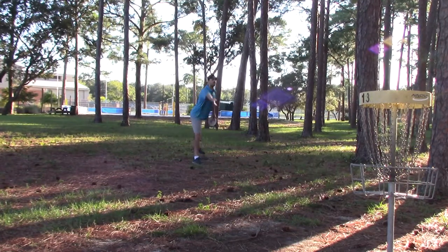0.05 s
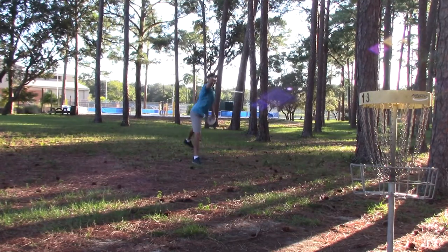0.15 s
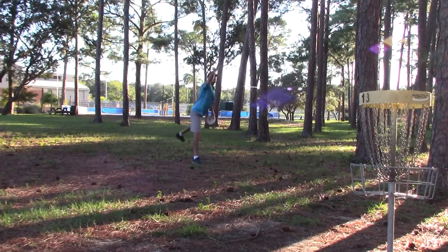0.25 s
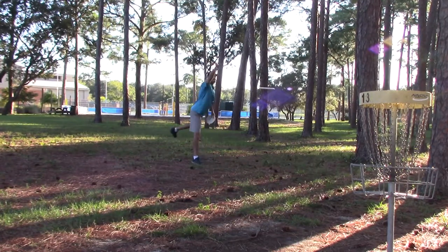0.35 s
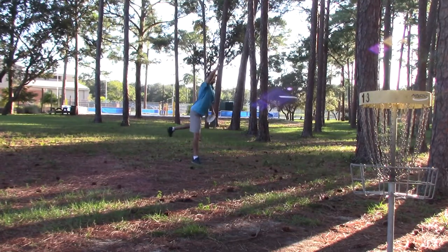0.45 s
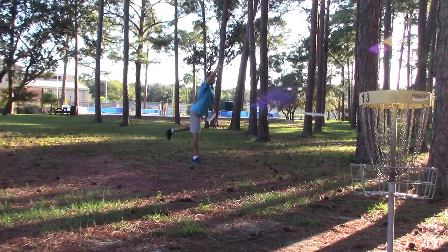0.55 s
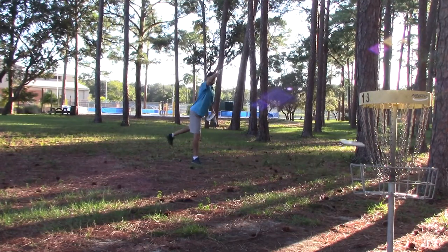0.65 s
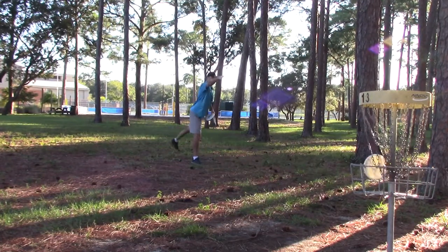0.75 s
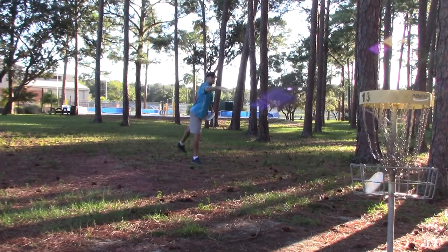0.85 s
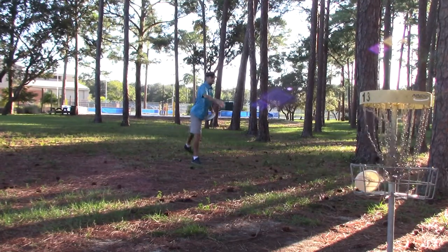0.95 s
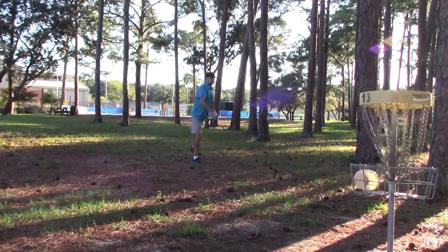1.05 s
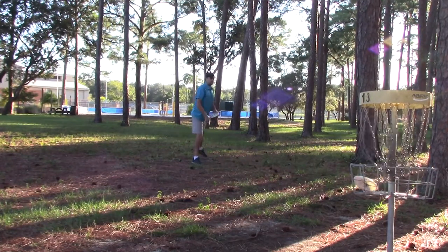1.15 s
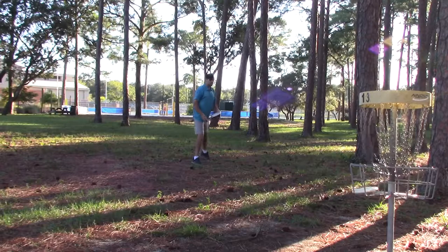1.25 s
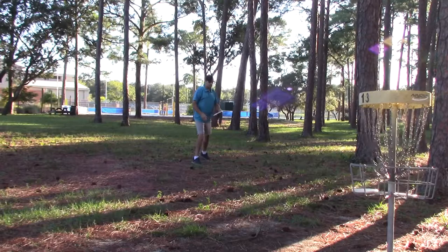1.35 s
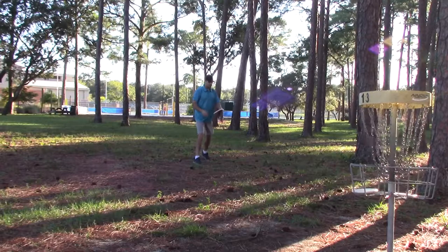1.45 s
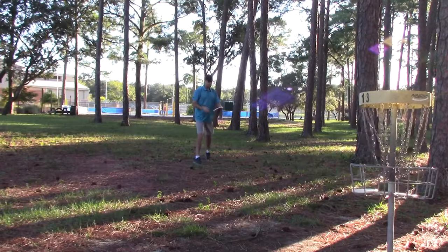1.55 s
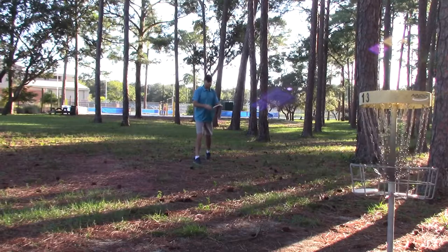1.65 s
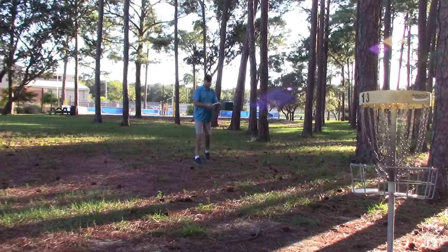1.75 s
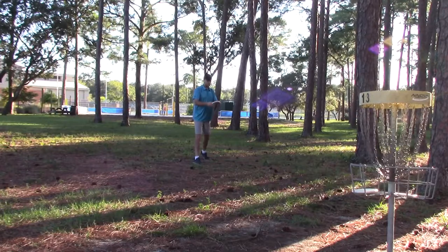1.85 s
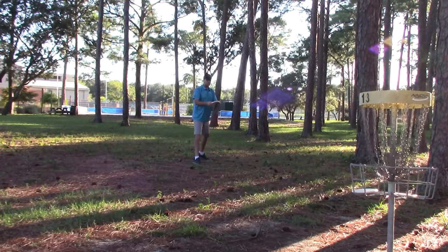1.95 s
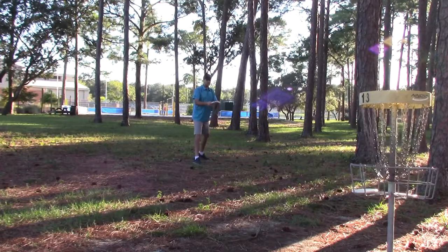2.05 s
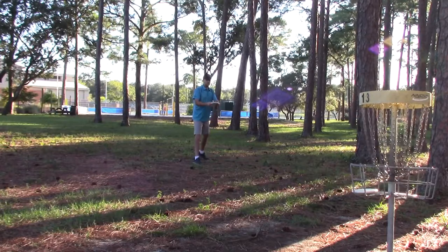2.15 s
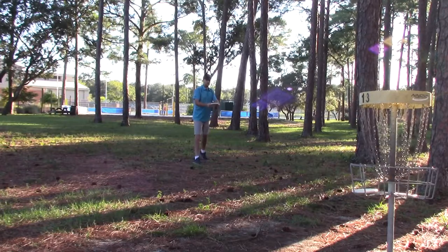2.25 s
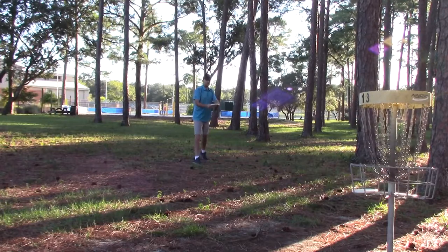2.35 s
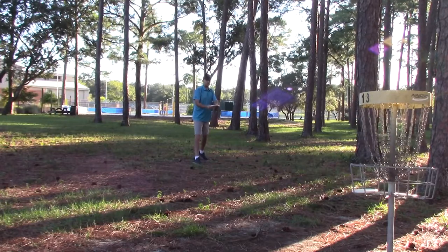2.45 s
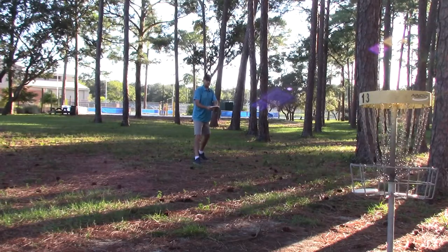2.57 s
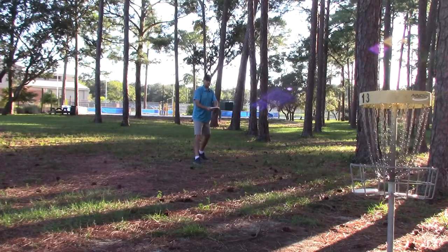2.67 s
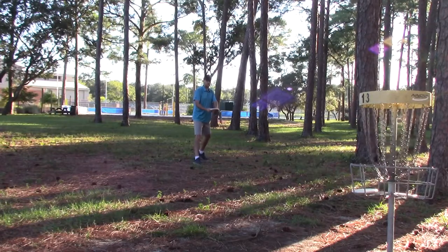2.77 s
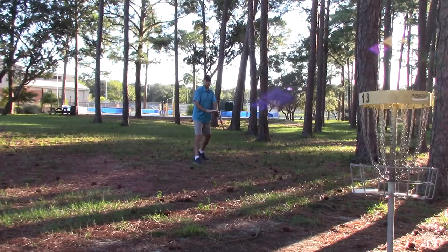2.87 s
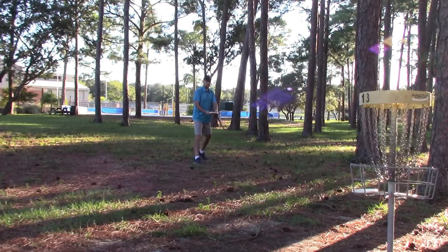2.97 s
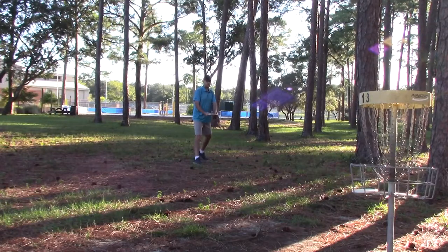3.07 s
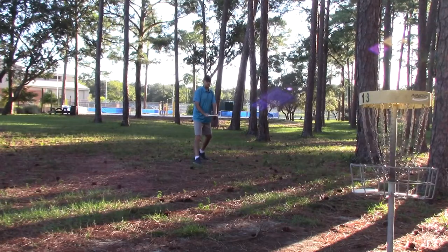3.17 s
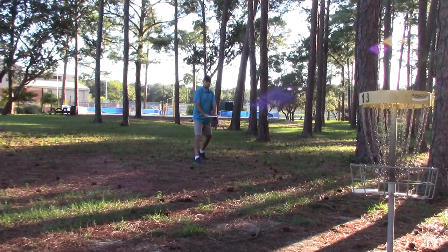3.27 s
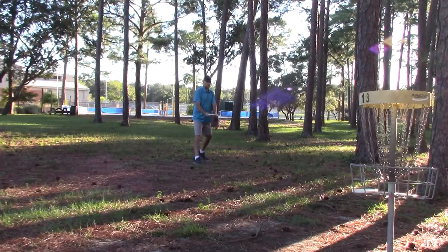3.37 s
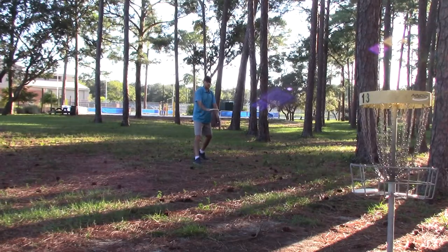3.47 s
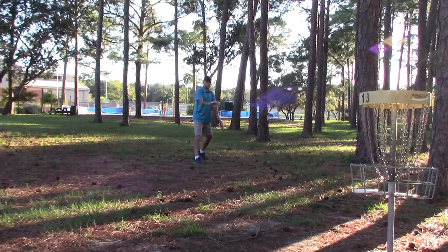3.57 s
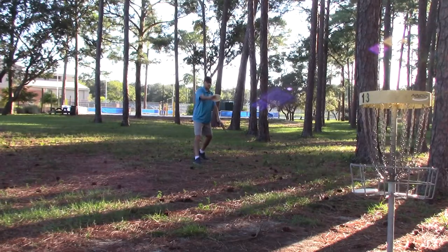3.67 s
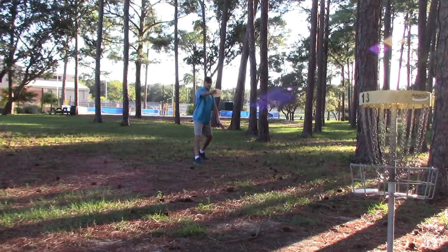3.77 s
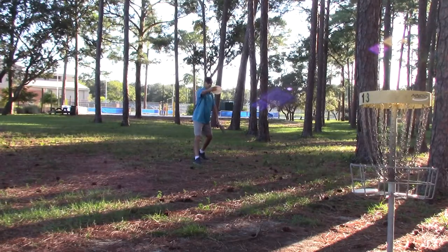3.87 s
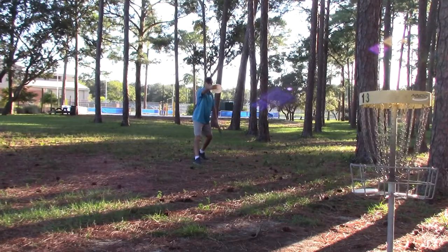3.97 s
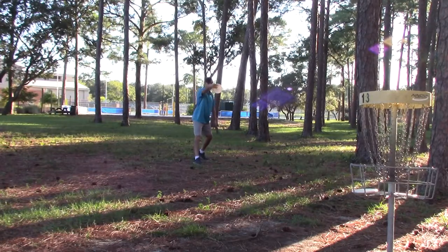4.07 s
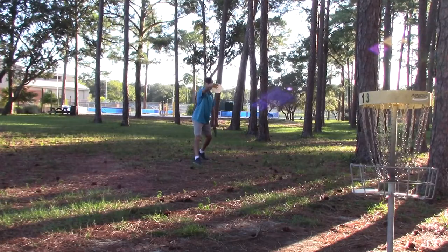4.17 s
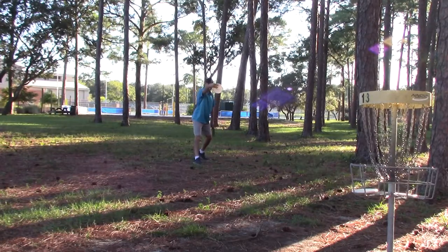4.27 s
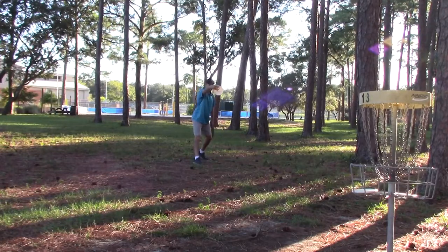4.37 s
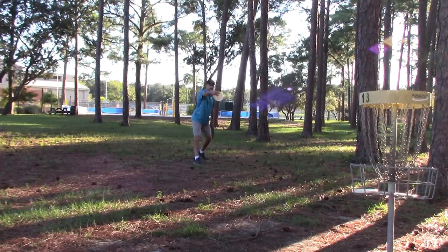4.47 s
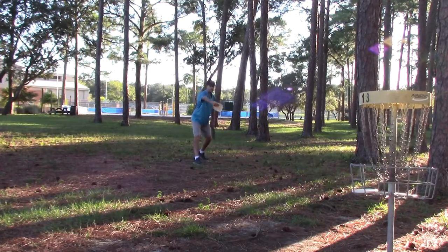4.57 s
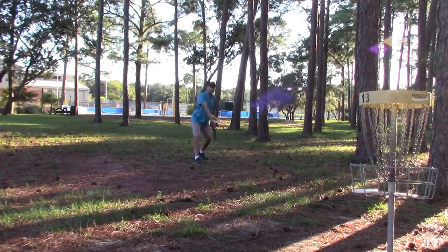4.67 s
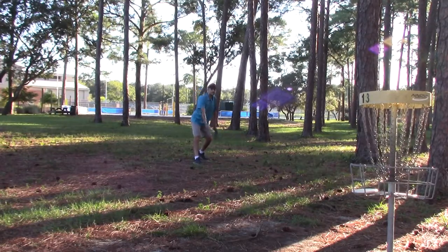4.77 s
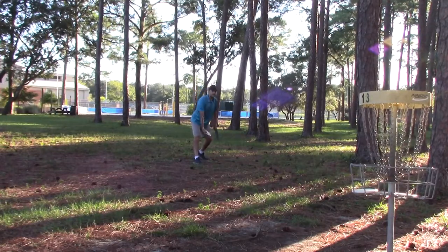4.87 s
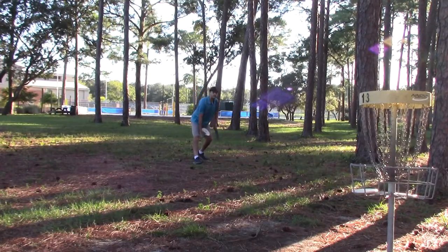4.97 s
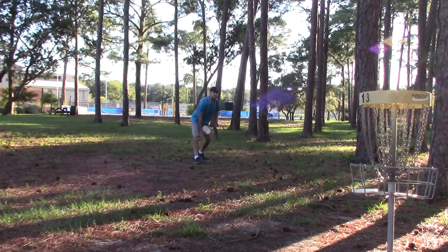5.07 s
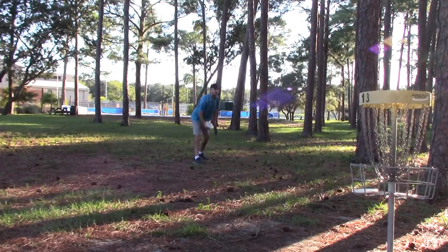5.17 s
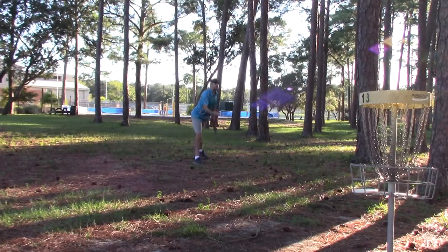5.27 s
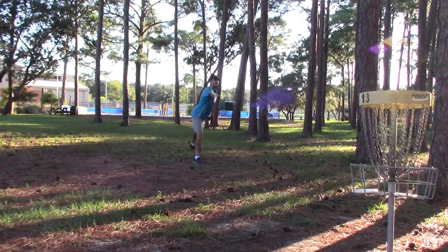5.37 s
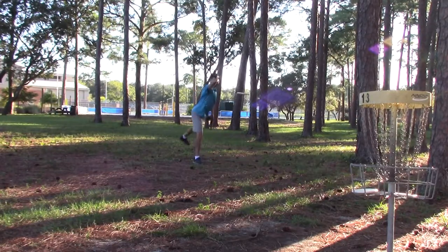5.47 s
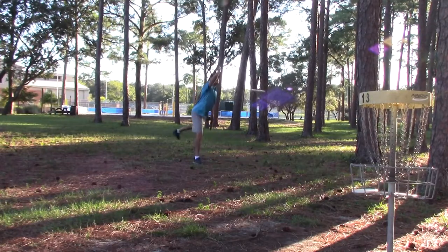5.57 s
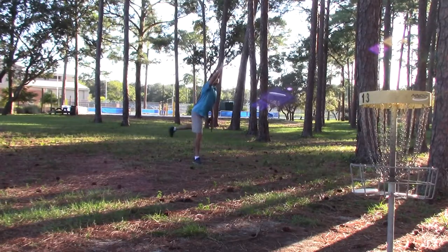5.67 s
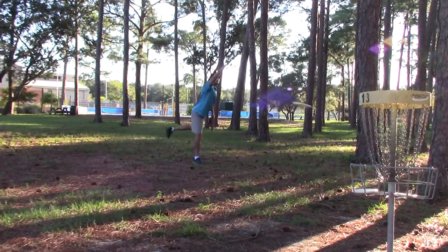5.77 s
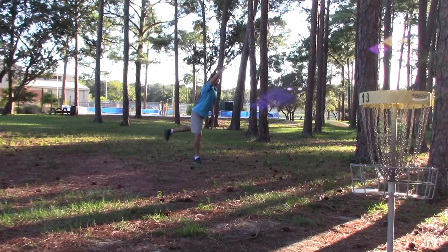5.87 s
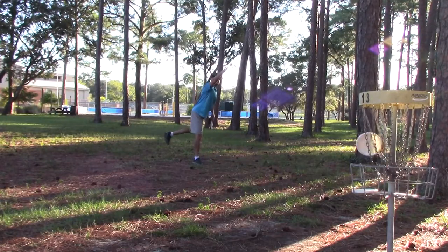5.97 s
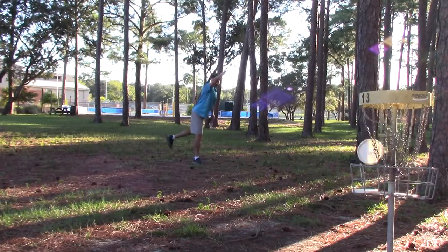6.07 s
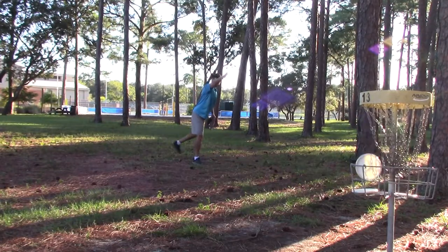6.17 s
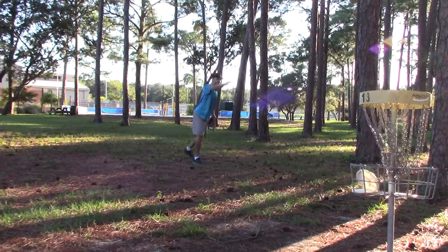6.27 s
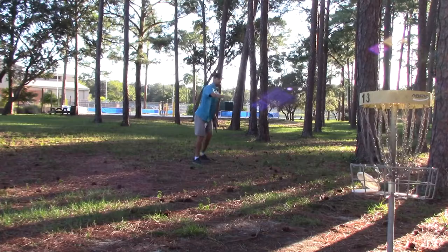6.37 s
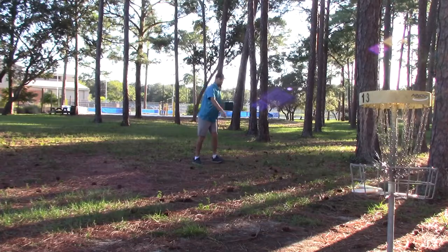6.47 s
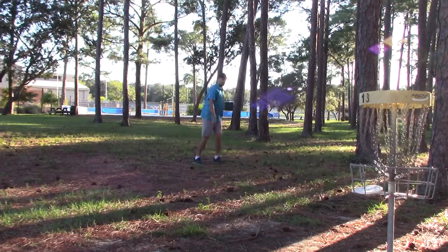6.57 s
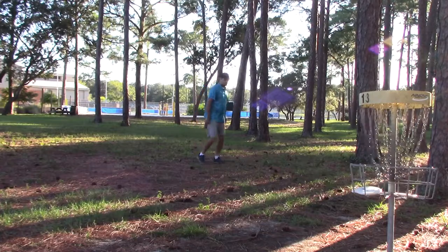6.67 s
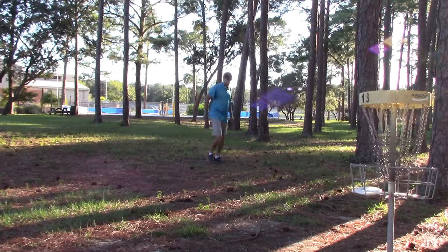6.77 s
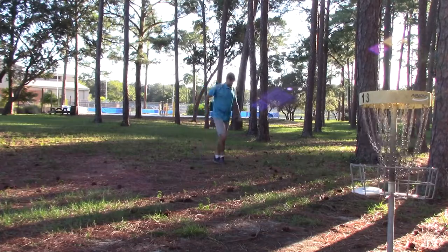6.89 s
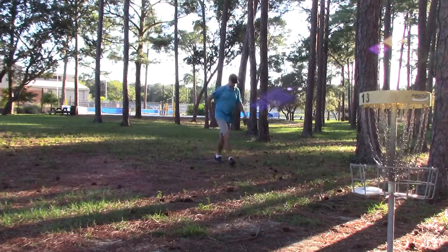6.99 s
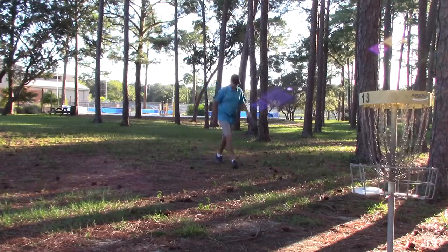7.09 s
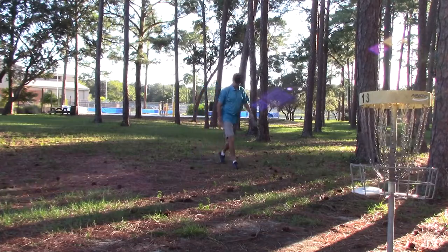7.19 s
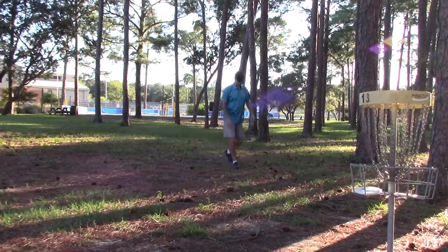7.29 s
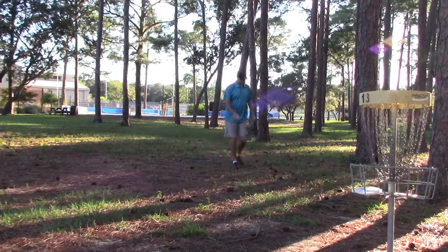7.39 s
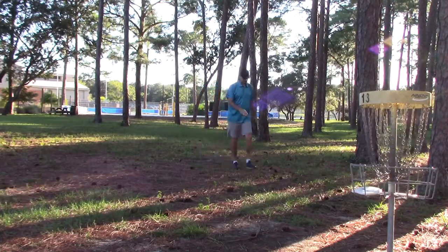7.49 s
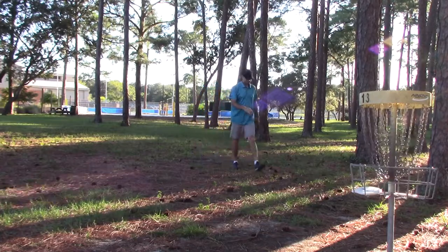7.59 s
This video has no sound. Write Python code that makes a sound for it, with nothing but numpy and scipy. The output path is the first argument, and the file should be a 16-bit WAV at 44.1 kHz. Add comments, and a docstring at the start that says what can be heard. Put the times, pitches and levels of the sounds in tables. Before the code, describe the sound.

Two discs, seconds apart, smash into metal chains close by, jangling and knocking into the tray, with sparse clinks and faint distant traffic between.

```python
"""Discs landing in a chain basket

Two plastic discs fly, one after the other, into the hanging chains of a steel basket in a wooded park.
Chain links clash and ring high, chains slap the centre pole and set it singing, the disc knocks in the tray.
The swing dies to lone clinks and squeaks over far traffic.
Metal and plastic are ringing modes struck by clicks; rattle, traffic and leaves are coloured noise."""
import sys
import numpy as np
from scipy import signal
from scipy.fft import rfft, irfft, next_fast_len
from scipy.io import wavfile

SR = 44100
rng = np.random.default_rng(int(sys.argv[2]) if len(sys.argv) > 2 else 0)


def materialize(psi):
    """Save the field psi as 16-bit PCM at rate SR to the path in sys.argv[1].

    A 1-D psi becomes a single channel; in a 2-D psi each row is a channel.
    """
    bounded = np.clip(np.atleast_2d(psi).T, -1, 1)
    quanta = np.round(bounded * 32767).astype(np.int16)
    wavfile.write(sys.argv[1], SR, quanta)


N = 336787   # length in samples


def from_db(db):
    """Turn a level in dB into a gain."""
    return 10 ** (np.asarray(db) / 20)


def rms_one(x):
    """Scale a sound to rms 1."""
    return x / np.sqrt(np.mean(x ** 2) + 1e-20)


def samples(times_s):
    """Turn times into sample numbers."""
    return np.round(np.asarray(times_s) * SR).astype(int)


def in_time(rows, silent=None):
    """Join table rows by straight lines; outside the table hold the end values, or use silent."""
    s, *columns = np.transpose(rows)
    t = np.arange(N) / SR
    return np.array([np.interp(t, s, column, silent, silent) for column in columns])


def at_hz(points, hz):
    """Read a table of (pitch_hz, level_db) at any pitch, on a log pitch axis."""
    points = np.array(points)
    return np.interp(np.log(hz), np.log(points[:, 0]), points[:, 1])


def coloured(x, spectrum):
    """Give noise a spectrum; white noise keeps its rms."""
    size = next_fast_len(N)
    hz = np.arange(1, size // 2 + 2) * SR / size
    gain = from_db(at_hz(spectrum, hz))
    return irfft(rfft(x, size) * rms_one(gain), size)[:N]


def drift(rate):
    """Wander slowly and at random, with rms 1; a higher rate wanders faster."""
    step = 40   # drawn at every 40th sample, then joined by lines
    r = np.exp(-2 * np.pi * step * rate / SR)
    noise = rng.standard_normal(N // step + 2002)
    slow = signal.lfilter([1], [1, -2 * r, r * r], noise)[2000:]
    return np.interp(np.arange(N) / step, np.arange(len(slow)), rms_one(slow))


def ring(clicks, hz, t60_s):
    """Let clicks set one mode ringing: a unit click starts a wave of height 1 that falls 60 dB in t60_s."""
    r, w = from_db(-60 / (t60_s * SR)), 2 * np.pi * hz / SR
    return signal.lfilter([.5, 0, -.5], [1, -2 * r * np.cos(w), r * r], clicks + 1e-18)


def dying(times_s, sizes, t60_s):
    """Make an envelope that jumps at each time and dies away, 60 dB in t60_s."""
    jumps = np.full(N, 1e-18)
    jumps[samples(times_s)] = sizes
    return signal.lfilter([1], [1, -from_db(-60 / (t60_s * SR))], jumps)


def clashes(per_s, uneven_db):
    """Scatter random clicks of uneven size, with unit power whatever their rate."""
    sizes = from_db(uneven_db * np.minimum(rng.exponential(1, N), 4))
    sizes = sizes * rng.choice([-1, 1], N)
    per_s = np.clip(per_s, 60, 5000)
    happens = rng.random(N) < per_s / SR
    return rms_one(sizes) * happens * np.sqrt(SR / per_s)


def tone(rows, waver_db):
    """Draw a sine along a pitch curve, wavering in level and faded at both ends."""
    hz, level_db = in_time(rows)
    t, start, end = np.arange(N) / SR, rows[0][0], rows[-1][0]
    fade = np.clip(np.minimum(t - start, end - t) / (0.24 * (end - start)), 0, 1)
    gain = np.sqrt(2) * fade * from_db(level_db + waver_db * drift(4))
    return gain * np.sin(2 * np.pi * np.cumsum(hz) / SR)


# colour of traffic and leaves: pitch_hz, level_db (per Hz, relative)
PARK_COLOUR = [(12, -70.5), (20, -39.5), (68, -22.5), (98, -5.5), (154, -5.5), (301, -9.5), (328, -12.5),
               (367, -12), (590, -8), (1000, -10.5), (3070, -28.5), (3950, -34), (4300, -35.5),
               (11100, -47.5), (16000, -63.5)]
# loudness of traffic and leaves: time_s, level_db
PARK_LEVEL = [(0.0, -54), (1.7, -52.5), (6.0, -54.5), (6.4, -51.5), (7.64, -54)]
# far engines, one table each: time_s, pitch_hz, level_db
ENGINES = [
    [(0, 170, -62), (1, 174, -64), (2, 177, -60), (3.4, 172, -60), (4, 162, -62), (5.2, 155, -61),
     (5.9, 149, -70)],
    [(3.7, 92, -66), (4.1, 116, -65), (4.5, 121, -64), (4.9, 110, -64), (5.4, 98, -67)],
]
# a short far hoot: time_s, pitch_hz, level_db
HOOT = [(3.47, 1130, -54.5), (3.5, 1100, -49), (3.53, 1034, -52), (3.6, 1080, -67.5)]


def park():
    """Mix the far traffic and leaves (noise), engines and a hoot (gliding sines) and a thin whine."""
    level_db = in_time(PARK_LEVEL)[0] + 1.1 * drift(5.6)
    wash = from_db(level_db) * coloured(rng.standard_normal(N), PARK_COLOUR)
    # noise through one narrow ringing mode gives a steady whine
    whine = from_db(-95) * rms_one(ring(rng.standard_normal(N), hz=11050, t60_s=0.0308))
    engines = sum(tone(rows, waver_db=1.5) for rows in ENGINES)
    return wash + whine + engines + tone(HOOT, waver_db=.4)


# dry snaps farther off: start_s, burst_db (before the band filter), pitch_hz (near the middle of the band)
SNAPS = [(3.1944, -42, 2800), (5.4026, -38.5, 1900)]


def snaps():
    """Make dry snaps from short bursts of noise, each in one broad band."""
    noise, out = rng.standard_normal(N), np.zeros(N)
    for s, burst_db, hz in SNAPS:
        band = signal.butter(2, [hz / 1.3, hz * 1.4], "band", fs=SR, output="sos")
        out += signal.sosfilt(band, noise * dying([s], from_db(burst_db), t60_s=0.038))
    return out


def trees(x):
    """Echo a sound off the trunks: scattered, dulled noise echoes that die away."""
    t60_s, first_echo_s = 0.3214, .012
    t = np.arange(int(t60_s * SR)) / SR
    echoes = rng.standard_normal(len(t)) * from_db(-60 * t / t60_s) * (t > first_echo_s)
    echoes = signal.lfilter([.4], [1, -.6], echoes)   # dulls the treble
    echoes = echoes / np.sqrt(np.sum(echoes ** 2))
    return signal.fftconvolve(x, echoes)[:N]


# links rubbing in fast slips: start_s, slips_per_s, length_s (cut off after twice this), level_db (relative)
SQUEAKS = [(1.545, 7700, 0.018, -52), (1.655, 4100, 0.027, -63.5), (2.175, 4230, 0.015, -55),
           (2.305, 4200, .014, -51), (2.323, 4330, 0.024, -56), (2.399, 7560, 0.014, -59),
           (2.489, 4310, 0.017, -61.5), (4.072, 4580, 0.026, -60.5), (6.723, 7430, .025, -52),
           (7.034, 4500, 0.033, -47.5), (7.248, 4100, .037, -56), (7.303, 4500, .025, -49.5),
           (7.586, 4300, 0.019, -49)]
# how strongly each pitch in a squeak comes out: pitch_hz, level_db
SQUEAK_COLOUR = [(3500, 10.5), (5000, -2), (8000, 16), (9500, 1.5), (13000, -15), (16000, -29)]


def squeaks():
    """Squeak as rubbing links do: unsteady slips make a few multiples of the slip rate, fluttering."""
    out, waver, flutter = np.zeros(N), drift(180), from_db(4.17 * drift(120))
    for s, slips_per_s, length_s, level_db in SQUEAKS:
        span = slice(round(s * SR), min(round((s + 2 * length_s) * SR), N))
        age = np.arange(span.stop - span.start) / SR / length_s
        phase = 2 * np.pi * np.cumsum(slips_per_s * (1 + .015 * waver[span])) / SR
        squeak = np.zeros(len(age))
        for k in range(1, int(16000 / slips_per_s) + 1):
            squeak += from_db(at_hz(SQUEAK_COLOUR, k * slips_per_s)) * np.sin(k * phase)
        swell = 8 * age * np.exp(-3 * age)
        out[span] += from_db(level_db) * squeak * flutter[span] * swell
    return out


# disc dragging through chains, then settling in the tray, one row a throw:
# start_s, drag_length_s, drag_db, settling_db, settled_at_s
RUB = [(0.741, 0.061, -28.5, -45.5, 1.36), (5.982, 0.077, -28.5, -46, 6.62)]


def rubbing_level():
    """Follow the rubbing of both throws in dB: hard drag, even settling, a drop and a slow fade."""
    levels = []
    for start, length, drag_db, settle_db, settled in RUB:
        drag_end = start + length
        still_db = settle_db - 10
        rows = [(start, drag_db), (drag_end, drag_db), (drag_end + 0.016, settle_db),
                (settled, settle_db), (settled + .15, still_db), (settled + 1.15, still_db - 7.5)]
        levels.append(in_time(rows, silent=-200)[0])
    return np.max(levels, axis=0)


# disc on metal: start_s, peak_db (relative), bright_db (modes above 1 kHz against the peak),
# spot_hz (pitch most excited by the spot struck)
KNOCKS = [(0.741, -29, 4, 990), (0.771, -19, -10, 900), (0.797, -31, 10.5, 755), (0.807, -17, -10, 900),
          (0.902, -12.5, -16, 900), (1.007, -19.5, -17, 795), (1.129, -27.5, -25, 800),
          (1.184, -27, -26, 695), (1.281, -27, -30, 670), (1.315, -25, -16, 710), (1.428, -27.5, -18, 561),
          (5.985, -33, -1, 682), (6.029, -12, -11, 720), (6.034, -18.5, -8, 795), (6.046, -12, -13, 775),
          (6.086, -22, -17, 845), (6.156, -44, -3, 705), (6.228, -28, -9, 790), (6.299, -10.5, -15, 870),
          (6.39, -31.5, -4, 900), (6.427, -29.5, -10, 990), (6.468, -40, -2, 800), (6.56, -25, -18, 880),
          (6.62, -31, -11, 770), (6.65, -34, -11, 830), (6.872, -44, -23, 730)]
# dull modes of the plastic: pitch_hz, level_db (relative), t60_s (time to fall 60 dB)
DISC_MODES = [(290, -10.5, 0.015), (387, -8.5, 0.036), (572, -6.5, 0.015), (697, -6.5, 0.042),
              (803, -6, .05), (903, -6, 0.023), (1210, 9, 0.0068), (1625, 3, 0.015), (2480, -2, 0.0091)]


def disc(rub_db):
    """Feed knocks and rubbing clicks into the dull modes of the plastic; a soft contact feeds the low ones."""
    s, peak_db, bright_db, spot_hz = np.transpose(KNOCKS)
    uneven_db = rng.normal(0, 1.5, (len(s), len(DISC_MODES)))
    skids = dying(s, from_db(peak_db - 21), t60_s=0.09)   # the disc skids and rattles after each knock
    rubbing = from_db(rub_db) + skids
    low, high = np.zeros((2, N))
    for m, (hz, level_db, t60_s) in enumerate(DISC_MODES):
        if hz > 1000:
            spot_db = bright_db
        else:
            spot_db = -np.minimum(40 * np.abs(np.log(hz / spot_hz)), 9)
        clicks = from_db(-22) * rubbing * clashes(900, uneven_db=2.0)
        clicks[samples(s)] += from_db(peak_db + uneven_db[:, m] + spot_db)
        rung = from_db(level_db) * ring(clicks, hz, t60_s)
        if hz > 1000:
            high = high + rung
        else:
            low = low + (-1) ** m * rung   # neighbouring modes start in opposite directions
    soft = signal.butter(2, 1100, fs=SR, output="sos")
    firm = signal.butter(2, 3500, fs=SR, output="sos")
    return signal.sosfilt(soft, low) + signal.sosfilt(firm, high)


# chain on pole: start_s, peak_db (of the main ring), t60_s (time to fall 60 dB while the chain leans on it)
POLE_HITS = [(0.769, -22, 0.87), (0.795, -16, 0.78), (0.813, -11.5, 0.42), (0.9095, -27.5, 0.6),
             (0.9346, -25, 0.65), (1.0082, -40, .22), (1.061, -23, 0.2), (1.103, -27, 0.33),
             (1.1828, -18.5, 0.044), (1.2044, -29, 0.21), (1.251, -36, 0.44), (1.2958, -26.5, 0.15),
             (1.3594, -42.5, 0.88), (1.443, -29, 0.65), (1.5765, -40, 0.74), (1.6814, -34, .9),
             (1.7165, -32.5, 0.74), (1.759, -37, .93), (1.822, -36, 0.86), (1.8878, -38, 0.57),
             (2.0384, -36.5, 1), (2.3287, -61, 0.37), (2.469, -65, 0.67), (2.626, -56.5, 0.57),
             (2.6628, -51, 0.22), (2.7298, -61, 0.37), (2.8175, -65, 0.42), (2.919, -51, 0.18),
             (3.0888, -67, .9), (3.1446, -66, 1), (3.6025, -63.5, 0.87), (4.089, -68.5, 0.56),
             (4.4996, -74.5, 0.55), (5.5374, -63.5, 0.59), (6.0166, -19, 0.1), (6.0493, -22.5, 0.19),
             (6.0799, -13, 0.11), (6.103, -20, 0.82), (6.177, -20, 0.41), (6.2363, -26, 0.53),
             (6.3152, -44, .54), (6.3465, -33, 0.57), (6.39, -17.5, 0.068), (6.4267, -18, 0.06),
             (6.4523, -22, 0.31), (6.514, -28.5, 0.16), (6.552, -40, .47), (6.6854, -34, 0.076),
             (6.7274, -39.5, 0.22), (6.843, -42, 0.32), (6.921, -37, 0.25), (6.9644, -44, 0.73),
             (7.0579, -30.5, .99), (7.1294, -33, 0.19), (7.162, -30.5, 0.48), (7.221, -31, .44),
             (7.242, -32, 0.42), (7.312, -39, 0.9), (7.353, -37, .99)]
# times when a chain comes to rest on the pole and chokes its ring: time_s
CHOKES = [0.874, 0.99, 1.215, 6.135, 6.28, 6.52, 7.113, 7.27]
# lesser pole modes: pitch_hz, level_db (against the slap), t60_s
POLE_MODES = [(3650, -33, 0.061), (3900, -19, 0.082), (4170, -23, 0.07), (4000, -7, 0.1),
              (4230, -19.5, .05), (4327, -16, 0.073), (4450, -23.5, 0.08), (3107, -32, 0.017)]


def pole():
    """Sing like a slapped pole: each slap restarts a close pair that beats and strikes the lesser modes."""
    main_hz, twin_hz, twin_db = 3886, 3920, -16.5
    choke_t60_s, rise_s = 0.061, 0.0016
    s, peak_db, t60_s = np.transpose(POLE_HITS)
    t = np.arange(N) / SR
    last = np.clip(np.searchsorted(s, t) - 1, 0, None)   # number of the latest slap
    level_db = peak_db[last] - 60 * (t - s[last]) / np.clip(t60_s[last], .03, 3)
    for rest_s in CHOKES:
        same_slap = last == last[round(rest_s * SR)]   # the next slap ends the choke
        level_db -= 60 * np.clip(t - rest_s, 0, None) / choke_t60_s * same_slap
    ringing_on = dying(s, from_db(peak_db - 30), t60_s=.8)   # a weak part rings on
    level = from_db(level_db) * (t > s[0]) + ringing_on

    draws = rng.normal(0, 1, (len(s), 2 + len(POLE_MODES)))
    # each slap shifts the phases; the main one glides to its new place
    main_phase = signal.lfilter([.01], [1, -.99], .8 * draws[:, 0].cumsum()[last])
    pair = np.sin(2 * np.pi * main_hz * t + main_phase)
    twin_gain = from_db(twin_db + 6.6 * drift(5.8))
    pair += twin_gain * np.sin(2 * np.pi * twin_hz * t + 3 * draws[last, 1])
    rise = np.exp(-1 / (rise_s * SR))
    out = signal.lfilter([1 - rise], [1, -rise], level) * pair

    for m, (hz, mode_db, mode_t60_s) in enumerate(POLE_MODES):
        clicks = np.zeros(N)
        clicks[samples(s)] = from_db(peak_db + mode_db + 3 * draws[:, 2 + m])
        out += ring(clicks, hz, mode_t60_s)
    return out


# chains in motion, one table a throw: time_s, link_ring_db, clatter_db (both relative)
SWING = [
    [(0.735, -27.5, -15), (0.81, -19, -24), (0.83, -24.5, -31.5), (1.05, -45.5, -29.5),
     (1.16, -45.5, -37.5), (1.2, -28, -34), (1.35, -41, -39), (1.65, -52.5, -49.5), (1.95, -55, -53),
     (2.2, -65, -55), (2.6, -68, -78.5), (2.95, -84, -77.5), (3.3, -89.5, -89)],
    [(5.985, -27.5, -20), (6.1, -23.5, -28.5), (6.16, -34.5, -35.5), (6.29, -38, -41), (6.31, -45, -31.5),
     (6.41, -41.5, -29.5), (6.43, -25.5, -27.5), (6.6, -36.5, -40), (6.73, -56, -41), (7.0, -50, -52.5),
     (7.05, -42.5, -44.5), (7.26, -44, -44), (7.637, -74, -66.5)],
]
# single clinks, also played by clatter and links: start_s, crack_peak_db, link_ring_db (both relative),
# spot_hz (pitch of the link modes most excited)
CLINKS = [(0.7429, -37, -20, 13200), (0.889, -58, -25, 11600), (1.0612, -34, -20, 10200),
          (1.151, -53, -35.5, 11300), (1.1723, -36, -19, 13200), (1.3623, -40, -33.5, 12600),
          (1.4022, -83, -33, 9300), (1.4386, -37.5, -28, 11700), (1.5102, -38, -23, 9500),
          (1.6192, -76, -40, 11000), (1.6824, -65, -46.5, 11500), (1.717, -43, -40.5, 11300),
          (1.7578, -76, -42, 12300), (1.7958, -78, -39, 9300), (1.8158, -69, -38.5, 9500),
          (1.878, -56, -38, 9300), (1.9075, -56, -46, 11200), (1.954, -57, -38, 11300),
          (2.032, -43.5, -49, 9900), (2.1136, -86, -50, 9300), (2.1765, -74, -47.5, 9400),
          (2.2347, -76, -58.5, 12600), (2.2668, -62, -53.5, 9300), (2.3117, -61, -56, 9300),
          (2.3845, -91, -58.5, 9300), (2.4673, -69.5, -51.5, 11700), (2.4998, -67.5, -67.5, 9300),
          (2.5399, -74, -58, 10400), (2.6, -67.5, -49, 11100), (2.6567, -66, -50.5, 9300),
          (2.7621, -86, -51, 9400), (2.7941, -86, -60.5, 9300), (2.8185, -59.5, -75.5, 9300),
          (2.9189, -53, -45.5, 9300), (3.0888, -66, -55.5, 9400), (3.1458, -89, -76, 11300),
          (3.235, -86.5, -72.5, 12900), (3.38, -82.5, -74.5, 9350), (3.4261, -80, -83.5, 9800),
          (3.496, -84.5, -60.5, 9500), (3.6003, -67, -60.5, 9300), (3.6786, -82.5, -57.5, 9300),
          (3.696, -84.5, -56, 9400), (3.8782, -68, -73.5, 9300), (4.0841, -76.5, -72, 10200),
          (4.2894, -79, -87, 10300), (4.5003, -83.5, -81, 9300), (4.5501, -84.5, -69.5, 9300),
          (5.5254, -82, -67.5, 9300), (5.99, -21, -22, 13200), (6.0438, -50, -12.5, 11600),
          (6.2578, -57, -34.5, 10900), (6.178, -36, -33.5, 10400), (6.3128, -43, -36, 13200),
          (6.3896, -48, -37, 11400), (6.4173, -33, -24.5, 11300), (6.428, -29, -27.5, 9300),
          (6.6023, -33.5, -38.5, 10400), (6.6867, -64, -48.5, 11700), (6.7311, -49, -36.5, 9300),
          (6.82, -63, -35, 11300), (6.8726, -62, -34.5, 13200), (6.9215, -64, -43.5, 11300),
          (7.005, -73, -47, 12300), (7.026, -60, -45, 12000), (7.042, -44, -46, 10300),
          (7.0883, -70, -38, 11600), (7.1307, -65, -50, 11300), (7.1676, -62, -38.5, 11400),
          (7.2115, -39.5, -39, 10000), (7.3083, -47, -45.5, 9300), (7.33, -58, -46.5, 9300),
          (7.349, -54, -45, 9500), (7.524, -91, -45.5, 13000)]


def swinging_chains():
    """Follow the link ring and clatter in dB; each clink shakes the chains up for a moment."""
    ring_db, clatter_db = np.max([in_time(rows, silent=-200) for rows in SWING], axis=0)
    s, crack_db, link_db, _ = np.transpose(CLINKS)
    ring_surge = dying(s, from_db(link_db - 18), t60_s=0.17)
    clatter_surge = dying(s, from_db(crack_db + 2.5), t60_s=0.13)
    ring_db = 20 * np.log10(from_db(ring_db) + ring_surge)
    clatter_db = 20 * np.log10(from_db(clatter_db) + clatter_surge)
    return ring_db, clatter_db


# colour of the rattle, pings and cracks: pitch_hz, level_db (per Hz, relative)
CLATTER_COLOUR = [(1060, -48), (1800, -17.5), (3380, -11), (3950, -4.5), (4210, -11.5), (5100, -16.5),
                  (9330, -13), (10200, -17), (12100, -17), (16000, -49.5)]
# colour of the shivering wires: pitch_hz, level_db (per Hz, relative)
SHIMMER_COLOUR = [(2500, -28), (4500, -9.5), (5300, -3), (6500, 6), (7800, -7.5), (9000, -4.5),
                  (13000, -25.5)]


def clatter(per_s, clatter_db, count=36):
    """Rattle the basket's many short modes: pings over hiss, a crack at each clink, then wires shimmering."""
    clicks, dealt = clashes(4.0 * per_s, uneven_db=2.5), rng.integers(0, count, N)
    pitches = np.geomspace(1700, 10000, count) * rng.normal(1, 0.0084, count)
    pings = np.zeros(N)
    for k, hz in enumerate(pitches):
        pings += ring(clicks * (dealt == k), hz, t60_s=.045) * np.sqrt(hz)
    pings = rms_one(coloured(pings, CLATTER_COLOUR))

    # the hiss swells at every click
    grains = signal.lfilter([1], [1, -from_db(-60 / (0.0072 * SR))], np.abs(clicks))
    hiss = coloured(rng.standard_normal(N), CLATTER_COLOUR)
    rattle = from_db(-9) * hiss * (0.43 + 0.39 * rms_one(grains)) + from_db(-5.0) * pings

    s, peak_db = np.array(CLINKS)[:, :2].T
    cracks = hiss * dying(s, from_db(peak_db), t60_s=.008)

    shiver = rng.standard_normal(N)
    thin_modes = rng.uniform(4300, 9000, count)
    lines = rms_one(sum(ring(shiver, hz, t60_s=.12) for hz in thin_modes))
    shimmer = rms_one(coloured(.6 * shiver + lines, SHIMMER_COLOUR))
    shimmer_db = 0.73 * peak_db - 18.5   # follows only part of the crack's dB
    wires = shimmer * dying(s, from_db(shimmer_db), t60_s=.26)
    return from_db(clatter_db) * rattle + cracks + wires


# middle pitch of each link mode, rising: pitch_hz
LINK_HZ = [6430, 7600, 8310, 9330, 10785, 11700, 12640, 13710, 14810]
# the same modes in that order: spread_hz (between links), level_db (relative), t60_s,
# group (0 low, 1 middle, 2 high)
LINK_MODES = [(100, -5.5, 0.026, 0), (90, -20.5, .05, 0), (70, -16, 0.023, 0), (130, 4, 0.038, 0),
              (62, -3.5, 0.089, 1), (141, 3, 0.13, 1), (119.7, -4.5, 0.08, 2), (110, -10.5, 0.073, 2),
              (150, -10.5, .06, 2)]
# middle of the low, middle and high group: pitch_hz
GROUP_HZ = [9300, 11300, 13200]


def links(per_s, ring_db, count=6):
    """Ring links that share modes, a little out of tune; a clash falls on one link, a clink shakes a few."""
    clinks = np.array(CLINKS)
    share = rng.exponential(1, (len(clinks), len(LINK_MODES), count)) ** 1.7
    share = share / np.sqrt(np.sum(share ** 2, axis=2)[:, :, None])
    late_s = rng.uniform(0, 0.0069, (len(clinks), count))   # the jolt runs along the chain
    at = samples(clinks[:, :1] + late_s)
    # groups away from the most excited pitch ring less: 49.5 dB per octave, 16 dB at most
    octaves_off = np.abs(np.log2(clinks[:, 3:] / GROUP_HZ))
    off_db = np.minimum(49.5 * octaves_off, 16)
    trains = [from_db(ring_db - 28.0) * clashes(per_s, uneven_db=6.0) for _ in GROUP_HZ]
    dealt, out = rng.integers(0, count, N), np.zeros(N)
    for m, (hz, (spread_hz, level_db, t60_s, group)) in enumerate(zip(LINK_HZ, LINK_MODES)):
        group = round(group)
        family = np.zeros(N)
        detunes = np.linspace(-1, 1, count) + rng.normal(0, .04, count)
        for k, detune in enumerate(detunes):
            clicks = trains[group] * ((dealt + m) % count == k)
            clicks[at[:, k]] += share[:, m, k] * from_db(clinks[:, 2] - off_db[:, group])
            family += from_db(-5 * detune ** 2) * ring(clicks, hz + detune * spread_hz, t60_s)
        out += from_db(level_db + 2.68 * drift(6)) * family   # touching links damp and free each other
    return out


def scene():
    """Play the basket, its echoes off the trees, the snaps and the park."""
    ring_db, clatter_db = swinging_chains()
    per_s = 900 * from_db(.5 * (ring_db + 31.5))   # a harder swing clashes more often
    chains = links(per_s, ring_db) + clatter(per_s, clatter_db)
    basket = chains + pole() + disc(rubbing_level()) + squeaks()
    first_touch_s = .736
    basket[:round(first_touch_s * SR)] = 0   # the basket hangs still until the disc arrives
    no_bass = signal.butter(4, 170, "highpass", fs=SR, output="sos")   # thin metal sends no bass
    basket = signal.sosfilt(no_bass, basket)
    return (basket + from_db(-25) * trees(basket) + snaps() + park())[None]


def record(dry):
    """Round off the peaks, then cut the treble above 15.7 kHz."""
    top = .42   # the level that rounded peaks approach
    rounded = top * np.tanh(dry / top)
    treble_cut = signal.ellip(10, .5, 70, 15700, fs=SR, output="sos")
    return signal.sosfilt(treble_cut, rounded)


dry = scene()
out = record(dry)
materialize(out)
```